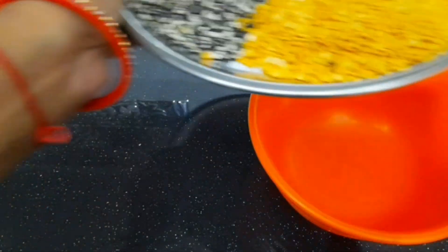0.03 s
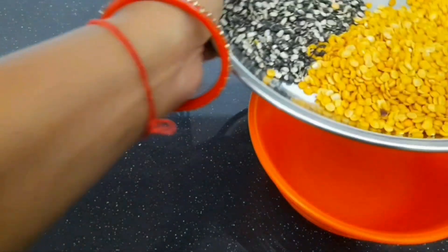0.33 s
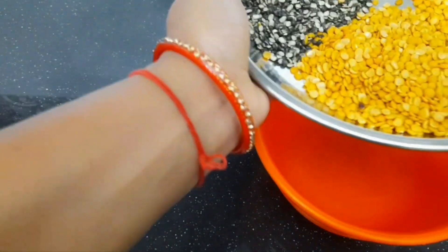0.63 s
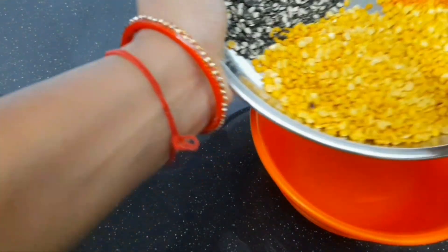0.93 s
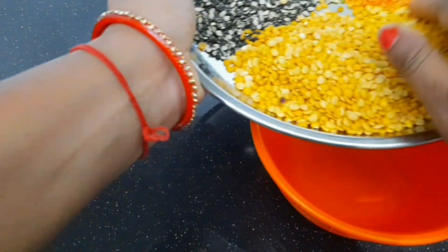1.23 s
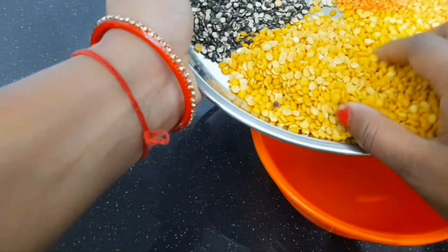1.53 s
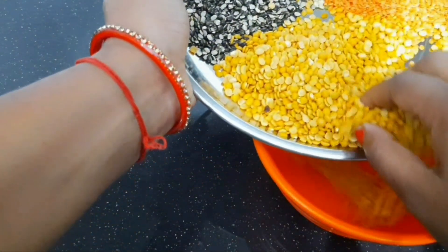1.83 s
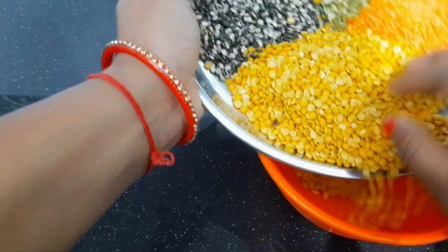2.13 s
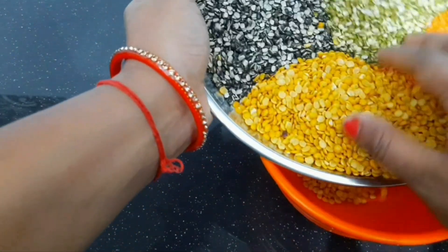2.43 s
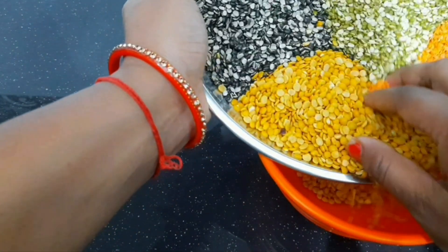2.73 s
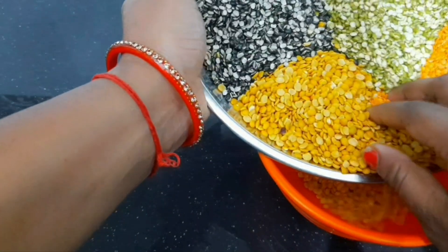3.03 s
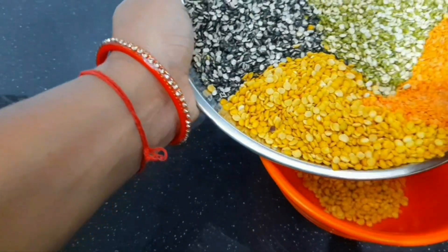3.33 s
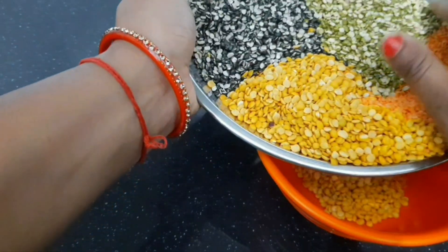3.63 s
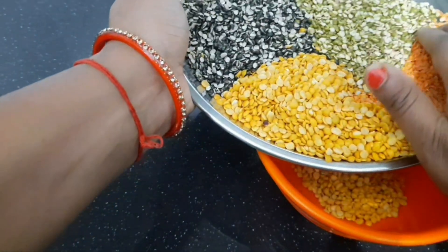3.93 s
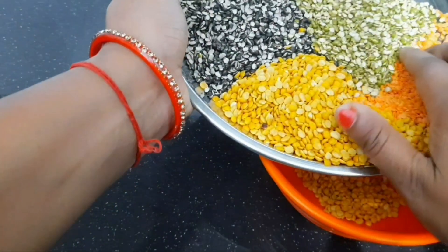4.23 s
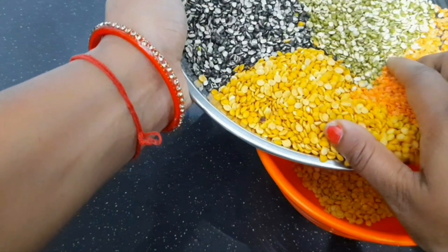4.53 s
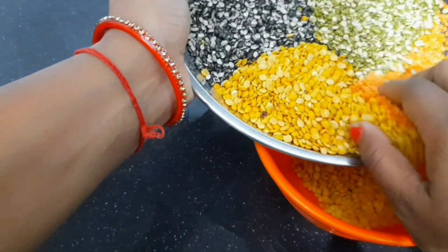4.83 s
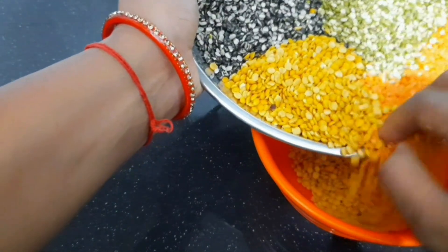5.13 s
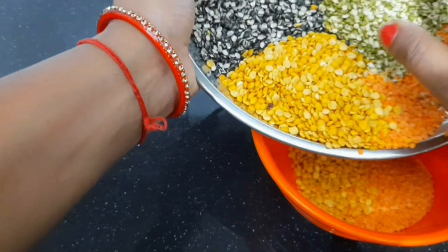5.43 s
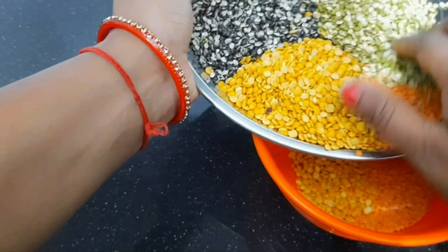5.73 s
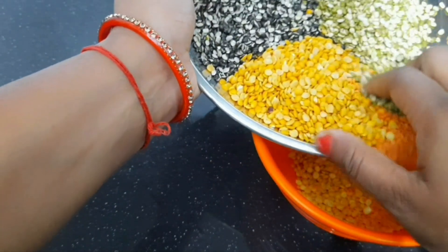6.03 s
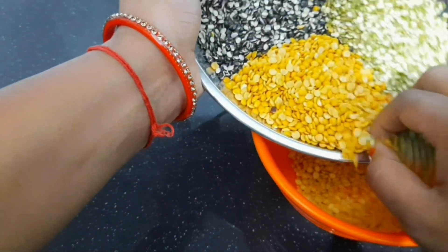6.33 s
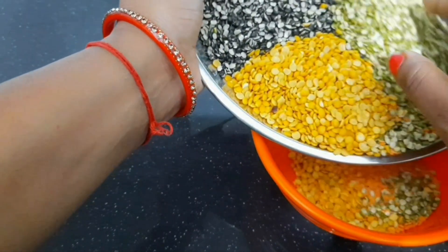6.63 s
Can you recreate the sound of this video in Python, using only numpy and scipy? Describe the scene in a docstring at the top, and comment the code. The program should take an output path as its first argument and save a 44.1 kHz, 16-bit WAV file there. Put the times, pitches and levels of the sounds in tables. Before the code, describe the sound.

Close by in a kitchen, dry split lentils shift on a steel plate, which knocks against the rim of a plastic bowl. Fingers rustle through the pile, then four surging handfuls fall, the grains skating off the steel, ticking on the heap and drumming on the bowl. More knocks and sharp clicks come among the pours. A low hum and a short echo from hard walls run throughout.

```python
"""Split lentils are pushed by hand off a steel plate into a plastic bowl, close by in a kitchen.
Over a low hum the pile slips, a lentil lands and the plate knocks on the bowl's rim. Fingers rustle
through the pile. From 1.8 s four surging handfuls fall, with more knocks among them: grains skate off
the steel, tick on the heap and drum on the bowl. Its bare floor clatters less as the heap covers it.
Hard walls echo throughout."""
import sys
import numpy as np
from scipy import signal
from scipy.fft import rfft, irfft
from scipy.io import wavfile

SR = 44100
rng = np.random.default_rng(int(sys.argv[2]) if len(sys.argv) > 2 else 0)


def unload_audio(sound):
    """Save the sound as a 16-bit wav file, at the path given as the first command line argument."""
    columns = np.transpose(np.atleast_2d(sound))
    # keep every value between -1 and 1, then stretch to whole-number steps
    steps = np.round(np.clip(columns, -1, 1) * 32767)
    wavfile.write(sys.argv[1], SR, steps.astype(np.int16))


N = 294764

# room noise spectrum: (frequency [Hz], density [dB])
AIR_SPECTRUM = [(25, -41), (55, -10.5), (100, -7.5), (180, 6.5), (280, -0.5), (400, 3), (520, -2),
                (800, -12.5), (1100, -24.5), (1450, -30.5), (1750, -19), (2200, -30), (5000, -32.5),
                (8000, -25), (16000, -33)]
# level of the low room noise, turned down by the recorder during the first pours: (time [s], level [dB])
AIR_LEVELS = [(0, -57), (1.9, -54), (3.1, -61), (4.7, -52.5), (6.68, -55.5)]
# appliance hum: (frequency [Hz], level [dB])
HUM_TONES = [(101, -72), (395, -60)]
# pile slips as the plate tips: (middle [s], half length [s], level [dB])
PILE_SLIDES = [(.01, 0.016, -58.5), (.46, .11, -70.5), (.516, 0.022, -49.5), (1.245, 0.034, -61.5)]
# fingers push through the pile: (start [s], length [s], start level [dB], change by the end [dB])
FINGER_STROKES = [(1.316, 0.31, -45, -0.5), (1.669, 0.12, -42, -1.5), (3.92, 0.477, -62.5, 8.5),
                  (5.446, 0.13, -50.5, -2.5), (5.734, 0.2, -53, 8.5), (6.019, 0.032, -47.5, -2),
                  (6.117, 0.5965, -53, 7)]
# hand drags over the plate: (middle [s], half length [s], level [dB])
HAND_DRAGS = [(1.55, 0.089, -48.5), (1.75, 0.11, -54), (2.2, .15, -66), (4.9, 0.16, -60)]
# lentils rubbing: (frequency [Hz], density [dB])
RUSTLE_SPECTRUM = [(100, -10), (400, -0.5), (750, 5), (1000, -3), (1400, -1.5), (1950, 2), (2600, -4),
                   (4000, -5), (6000, -2), (7800, 1), (11000, -0.5), (16000, 2.5)]
# single lentils and clumps land: (time [s], level [dB], bounces re first contact [dB])
LANDINGS = [(.781, -30, -6.5), (1.331, -32, -12), (1.775, -23.5, -11), (1.815, -23.5, -0.5),
            (2.743, -33, 2), (2.81, -25, -2), (3.503, -28, -7), (3.531, -28.5, 2.5), (3.545, -30, 1.5),
            (3.586, -31.5, -0.5), (3.736, -35.5, -0.5), (4.448, -38, -12), (4.594, -22.5, -2),
            (4.771, -17, -1), (4.823, -16, -0.5), (4.887, -11, -5.5), (4.956, -14.5, -13),
            (5.521, -25.5, -5), (5.554, -27, -7), (5.663, -42, 0), (5.751, -34, -5), (6.4557, -18.5, -19)]
# lentil on heap: (frequency [Hz], density [dB])
HEAP_SPECTRUM = [(30, -62), (150, -28), (400, -14.5), (1150, -19.5), (1650, -12), (2250, -25.5), (2900, -8),
                 (3450, -10), (4000, -8), (5200, -3), (6400, -4.5), (8000, 1), (9300, -3), (11000, 0.5),
                 (16000, -5.5)]
# plate hits bowl: (time [s], level [dB], favoured pitch [Hz], clack offset [dB], rise [s])
RIM_KNOCKS = [(.782, -40.5, 690, 6.5, .002), (.818, -22, 733, -2, 0.0053), (0.9405, -14, 740, -6, 0.0018),
              (2.326, -28.5, 680, 11, 0.0023), (2.524, -20, 690, 1, 0.0025),
              (2.545, -28, 657, -18.5, 0.00084), (3.76, -29, 577, -5, 0.0024),
              (3.955, -15.5, 503, -8, 0.0027), (3.989, -26.5, 490, -26, 0.0031),
              (4.296, -42, 577, -38, 0.0041)]
# bowl walls: (frequency [Hz], level [dB], t60 [s])
WALL_MODES = [(355, -9.5, 0.13), (432, -43, 0.032), (466, -5.5, 0.12), (519.7, -0.5, 0.38),
              (603.5, 1.5, 0.27), (649, 1, 0.087), (695.5, 8.5, 0.095), (742, 10, 0.036), (870, -42, 0.14)]
# steel on plastic: (frequency [Hz], density [dB])
CLACK_SPECTRUM = [(200, -13.5), (900, 5.5), (1150, 1.5), (1400, -2.5), (1680, 6), (1900, -3.5), (2150, -1),
                  (2450, -6), (2780, -3), (3050, -0.5), (3400, -2), (4000, -10.5), (8000, -15.5),
                  (16000, -25)]
# surges over the rim: (start [s], crest [s], empty [s], crest level [dB], drumming [dB], skating [dB])
SURGES = [(1.796, 1.869, 2.71, -24.5, -6, -10), (1.874, 1.976, 2.13, -24.5, -11.5, -24),
          (2.68, 2.769, 3.05, -40.5, -7, -16), (2.836, 2.959, 3.2, -34.5, -11, -12),
          (2.928, 3.168, 3.521, -32.5, -17, -12.5), (3.1, 3.132, 3.22, -30.5, -3, -15),
          (4.44, 4.943, 5.24, -29.5, -7.5, -23), (4.918, 5.175, 5.53, -29, -9.5, -10),
          (5.408, 5.428, 5.485, -30.5, -15.5, -11), (6.203, 6.43, 7.2, -39, -7.5, -12)]
# steel plate, damped by its load: (frequency [Hz], level [dB], t60 [s])
PLATE_MODES = [(3040, -2, 0.025), (3338, 1.5, 0.029), (3482, 0.5, 0.037), (5300, 0.5, 0.03),
               (5970, -4, 0.0044), (9200, -23, 0.011)]
# bare bowl floor: (frequency [Hz], level [dB], t60 [s])
FLOOR_MODES = [(1660, 0, 0.023), (1977, 4, 0.054), (2220, 12, 0.017), (2418, 12.5, 0.016), (2710, 2, 0.026),
               (3155, 7, 0.032), (3300, 14, 0.005), (3940, -27, 0.012)]
# counter and near walls: (delay [s], relative level [dB])
NEAR_ECHOES = [(.0105, -18), (.0205, -16), (.029, -27)]


def undb(db):
    """Decibels to amplitude."""
    return 10 ** (np.asarray(db) / 20)


def walk(rate_hz):
    """Slow random drift, spread near 1."""
    knots = rng.standard_normal(4096)
    return 1.2 * np.interp(np.arange(N) / SR * rate_hz, np.arange(len(knots)), knots)


def convolve(x, response):
    """Apply an impulse response; keep N samples."""
    return signal.oaconvolve(np.atleast_2d(x), np.atleast_2d(response), axes=1)[:, :N]


def colour(x, spectrum, size=4096):
    """Minimum-phase filter, unit power gain."""
    hz, db = np.transpose(spectrum)
    bins_hz = np.arange(size // 2 + 1) * SR / size
    log_gain = np.log(undb(np.interp(np.log(bins_hz + 1), np.log(hz), db)))
    cepstrum = irfft(log_gain) * np.r_[1, np.full(size // 2 - 1, 2), np.zeros(size // 2)]
    response = irfft(np.exp(rfft(cepstrum)))
    return convolve(x, response / np.linalg.norm(response))


def ring(modes, gains=1):
    """Damped modes after one blow, band-limited to their range, unit energy."""
    t = np.arange(SR // 2) / SR
    hz, db, t60_s = np.transpose(modes)[:, :, None]
    partials = gains * undb(db) * np.sin(2 * np.pi * hz * t) * np.exp(-np.log(1000) * t / t60_s)
    band = signal.butter(2, [0.99 * hz.min(), 1.07 * hz.max()], "band", fs=SR, output="sos")
    response = signal.sosfilt(band, partials.sum(0))
    return response / np.linalg.norm(response)


def pan(x, left_db):
    """Left channel left_db above the right."""
    return x * undb(np.array([[left_db], [-left_db]]) / 2)


def noise_pair(size, coherence):
    """Stereo noise; the shared part leads on the right."""
    shared, own = rng.standard_normal(size), rng.standard_normal((2, size))
    return np.sqrt(coherence) * np.array([np.roll(shared, 2), shared]) + np.sqrt(1 - coherence) * own


def impacts(per_s, scatter_db):
    """Random blows of uneven size, mean power 1."""
    chance = np.clip(per_s / SR, 1e-4, 1)
    sizes = undb(scatter_db * rng.standard_normal(N).clip(-2, 2))
    sizes /= np.sqrt(np.mean(sizes ** 2))
    return (rng.random(N) < chance) * sizes * rng.choice([-1, 1], N) / np.sqrt(chance)


def ticks(blows, decay_s, coherence, kinds=24):
    """One short burst per blow; its colour shifts as the contact spot wanders."""
    t, out = np.arange(SR // 200) / SR, 0
    kind = (np.arange(N) * 30 // SR + rng.integers(0, 5, N)) % kinds
    for k in range(kinds):
        tick = noise_pair(len(t), coherence) * np.exp(-t / decay_s)
        out = out + convolve(blows * (kind == k), tick / np.linalg.norm(tick) * np.sqrt(2))
    return out


def kitchen():
    """Low room noise and a wavering appliance hum."""
    t = np.arange(N) / SR
    air = colour(noise_pair(N, 0.65), AIR_SPECTRUM)
    air *= undb(np.interp(t, *np.transpose(AIR_LEVELS)) + walk(9.1))
    hum = 0
    for hz, db in HUM_TONES:
        amplitude = np.sqrt(2) * undb(db + 1.4 * walk(9))
        hum += amplitude * np.sin(2 * np.pi * hz * t + 0.49 * walk(18))
    return pan(air + hum, left_db=4.5)


def swells(moves):
    """Bell envelopes: each move gathers speed, then comes to rest."""
    t = np.arange(N) / SR
    bells = [undb(db) * np.exp(-((t - middle_s) / half_s) ** 2 / 2) for middle_s, half_s, db in moves]
    return np.linalg.norm(bells, axis=0)


def stroke(start_s, length_s, db, change_db, attack_s=0.018, release_s=0.082):
    """Finger pressure: quick attack, push, then the pile settles."""
    t = np.arange(N) / SR - start_s
    push = undb(db + change_db * np.clip(t / length_s, 0, 1))
    return push * np.clip(t / attack_s, 0, 1) * np.exp(-np.maximum(t - length_s, 0) / release_s)


def stirring():
    """Sliding or pushed lentils rub in tiny slips; the dragging hand rumbles the plate."""
    pressure = sum(stroke(*row) for row in FINGER_STROKES) * undb(0.26 * walk(45))
    push_slips = pressure * impacts(3500, scatter_db=-0.5)
    pushed = colour(ticks(push_slips, decay_s=0.00072, coherence=0.32), RUSTLE_SPECTRUM)
    slide_slips = swells(PILE_SLIDES) * impacts(3300, scatter_db=5.5)
    sliding = colour(ticks(slide_slips, decay_s=0.00011, coherence=0.36), RUSTLE_SPECTRUM)
    rumble_hz_db = [(20, -12), (60, -6), (85, -4), (102, 10.5), (125, 0.5), (250, -4.5),
                    (1000, -10.5), (4000, -82.5)]
    rumble = colour(noise_pair(N, 0.99), rumble_hz_db) * swells(HAND_DRAGS)
    return pan(undb(4) * (pushed + sliding), left_db=6) + pan(rumble, left_db=8.5)


def landings(contact_s=0.003, bounce_t60_s=0.065):
    """A lentil or clump lands: sharp contact, then a fading rattle of bounces."""
    out, t = np.zeros((2, N + SR)), np.arange(SR // 6) / SR
    for time_s, db, bounce_db in LANDINGS:
        bounces = undb(bounce_db) * np.exp(-np.log(1000) * t / bounce_t60_s)
        envelope = np.maximum(np.exp(-t / contact_s), bounces)
        start = int(time_s * SR)
        out[:, start:start + len(t)] += undb(db - 2) * noise_pair(len(t), 0.19) * envelope
    return pan(colour(out[:, :N], HEAP_SPECTRUM), left_db=5)


def knocks(damping_s=0.019):
    """Plate bumps bowl and damps it; the contact spot picks the modes, a hard touch adds a clack."""
    thuds, clacks, t = np.zeros(N + SR), np.zeros(N + SR), np.arange(SR // 2) / SR
    for time_s, db, pitch_hz, clack_db, rise_s in RIM_KNOCKS:
        span = slice(int(time_s * SR), int(time_s * SR) + len(t))
        spread_oct = 0.001 / rise_s  # a slow touch rings fewer modes
        offset_oct = np.log2(np.array(WALL_MODES)[:, :1] / pitch_hz)
        thud = ring(WALL_MODES, 1 / (1 + (offset_oct / spread_oct) ** 2))
        thud *= np.exp(-t / damping_s) * (1 - np.exp(-(t / rise_s) ** 2))
        thuds[span] += undb(db) * thud / abs(thud).max()
        clack = rng.standard_normal(len(t)) * np.exp(-t / 0.006) * (1 - np.exp(-t / 0.0004))
        clacks[span] += undb(db + clack_db - 13.5) * clack
    return pan(thuds[:N] + colour(clacks[:N], CLACK_SPECTRUM), left_db=6)


def surge(start_s, crest_s, empty_s, swell_db=17.5):
    """Flow swells to 1, then dwindles as the lentils run out."""
    t = np.arange(N) / SR
    to_go = np.clip((crest_s - t) / (crest_s - start_s), 0, 1)
    spent = np.clip((t - crest_s) / (empty_s - crest_s), 0, 1)
    return (t >= start_s) * undb(-swell_db * to_go ** 0.97) * (1 - spent ** 2) ** 1.31


def pour(covered_db=-27, full_flow_db=-29, cushion_db_per_db=0.24):
    """More flow, more grains per second: they skate off the plate, tick on the heap, shake the bowl."""
    powers = np.array([(undb(db) * surge(*times_s)) ** 2 for *times_s, db, _, _ in SURGES])
    flow = np.sqrt(powers.sum(0)) + 1e-9
    drum_db, skate_db = np.array(SURGES)[:, 4:].T @ powers / flow ** 2
    clumps = undb(1.4 * walk(90))
    blows = flow * clumps * impacts(900 + 7000 * flow / flow.max(), scatter_db=-1)
    heap = colour(ticks(blows, decay_s=0.00033, coherence=0.16), HEAP_SPECTRUM)
    steel = convolve(blows * undb(skate_db) * rng.standard_normal((2, N)), ring(PLATE_MODES))
    # the growing heap muffles the floor
    filled = np.cumsum(flow ** 2) / np.sum(flow ** 2)
    floor_blows = blows * undb(covered_db * filled ** 3.6)
    clatter = convolve(floor_blows * (0.34 + 0.58 * rng.standard_normal((2, N))), ring(FLOOR_MODES))
    # in a thick stream grains land on each other
    drumming = undb(drum_db) * (flow / undb(full_flow_db)) ** -cushion_db_per_db
    # hits low in the bowl favour the middle modes
    offset_oct = abs(np.log2(np.array(WALL_MODES)[:, :1] / 615))
    walls = convolve(blows * drumming, ring(WALL_MODES, undb(-24 * offset_oct)))
    return (pan(undb(2.5) * heap + steel, left_db=5.5)
            + pan(undb(-6) * clatter, left_db=1)
            + pan(undb(-7.5) * walls, left_db=6.5))


def room(x, near_db, tail_db, t60_s, coherence, turn_rad):
    """Direct sound, near echoes and two diffuse tails that crossfade as the source moves."""
    t = np.arange(SR * 2 // 3) / SR
    envelope = np.exp(-np.log(1000) * t / t60_s) * (1 - np.exp(-t / 0.00067))
    out = x
    for share in np.cos(turn_rad), np.sin(turn_rad):
        tail = noise_pair(len(t), coherence) * envelope
        out = out + undb(tail_db) * convolve(x * share, tail / np.linalg.norm(tail[0]))
    for delay_s, db in NEAR_ECHOES:
        out = out + undb(db + near_db) * np.pad(x, ((0, 0), (int(delay_s * SR), 0)))[:, :N]
    return out


def scene():
    """Lentils and knocks in a small hard room."""
    lentils = pour() + stirring() + landings()
    lentils = room(lentils, near_db=-0.5, tail_db=-4, t60_s=0.34, coherence=0.023, turn_rad=2 * walk(12))
    bumps = room(knocks(), near_db=3, tail_db=3, t60_s=0.31, coherence=0.73, turn_rad=walk(1))
    return lentils + bumps + kitchen()


def record(dry, cutoff_hz=15950):
    """Steep low-pass on the microphone signal."""
    return signal.sosfilt(signal.ellip(12, 0.2, 80, cutoff_hz, fs=SR, output="sos"), dry)


dry = scene()
out = record(dry)
unload_audio(out)
```